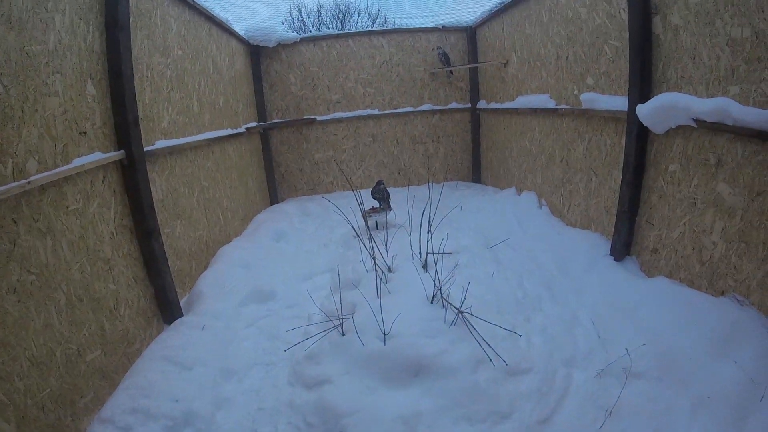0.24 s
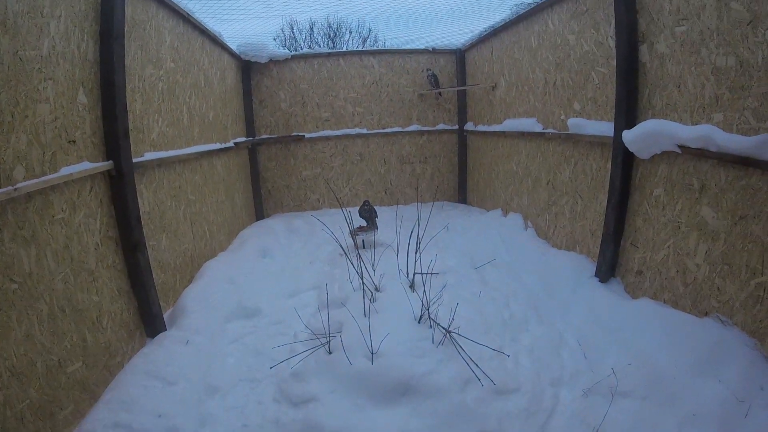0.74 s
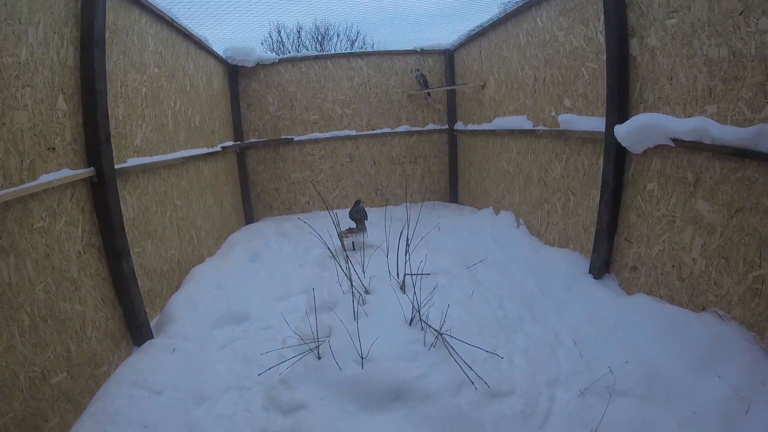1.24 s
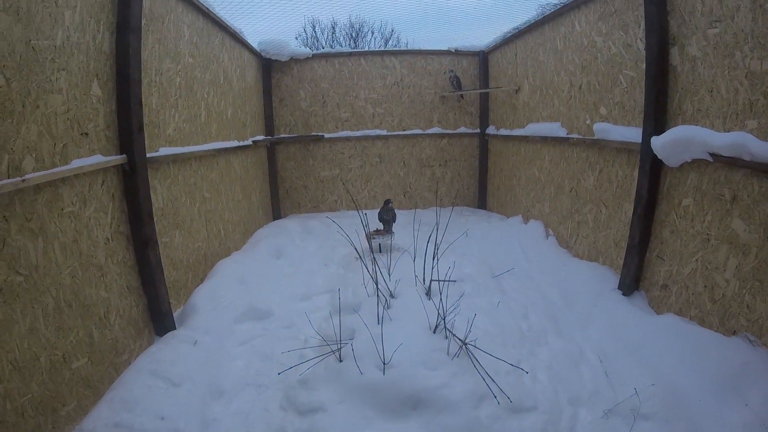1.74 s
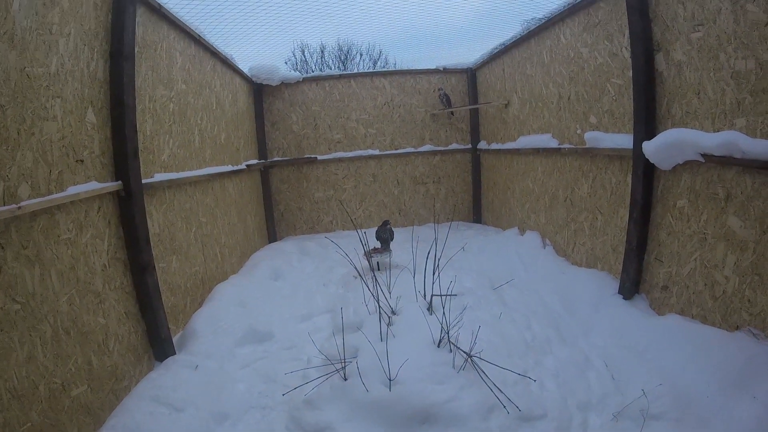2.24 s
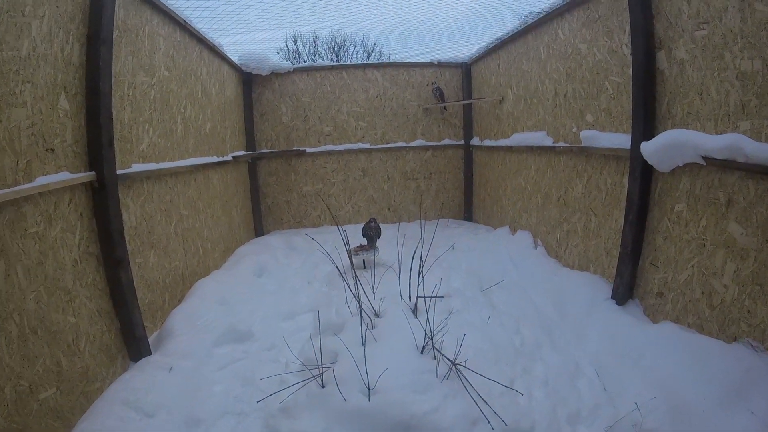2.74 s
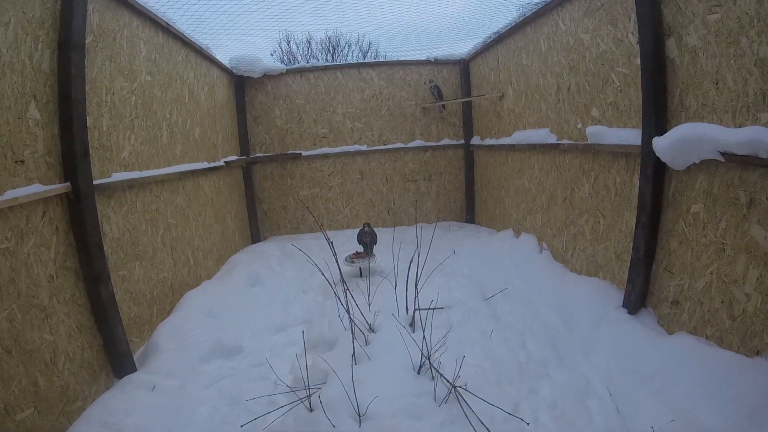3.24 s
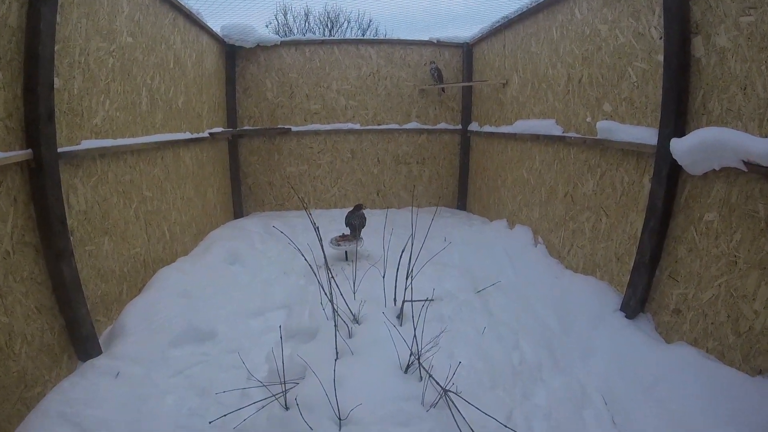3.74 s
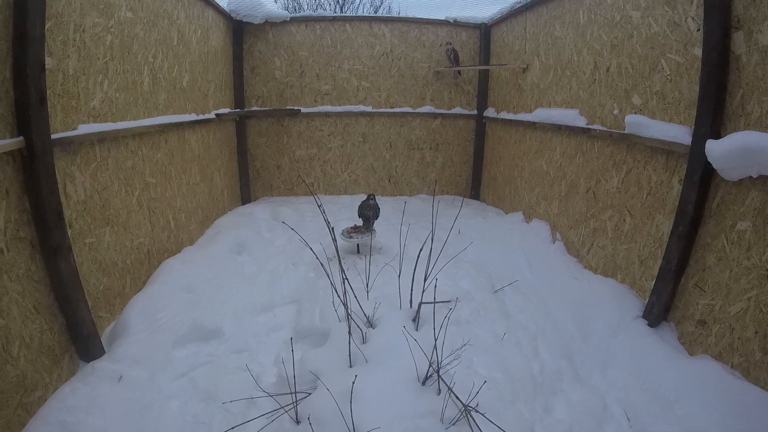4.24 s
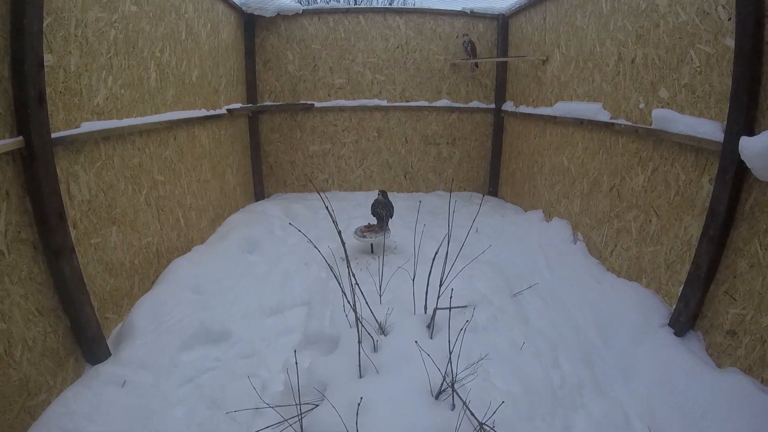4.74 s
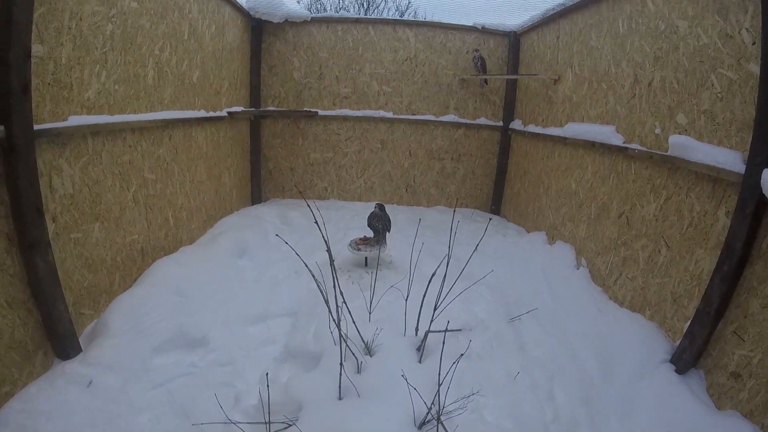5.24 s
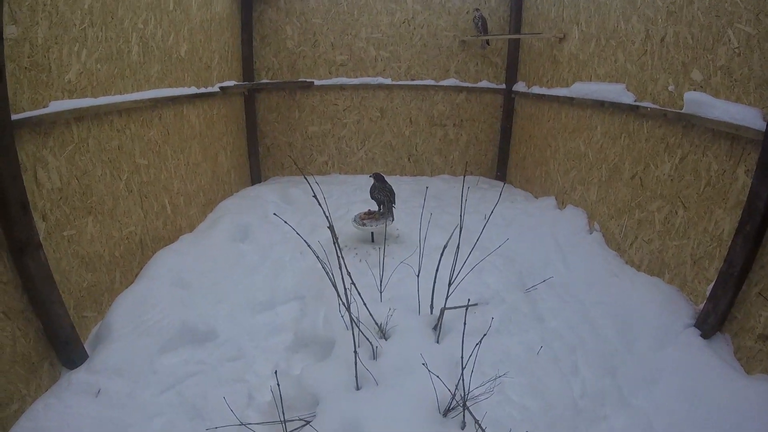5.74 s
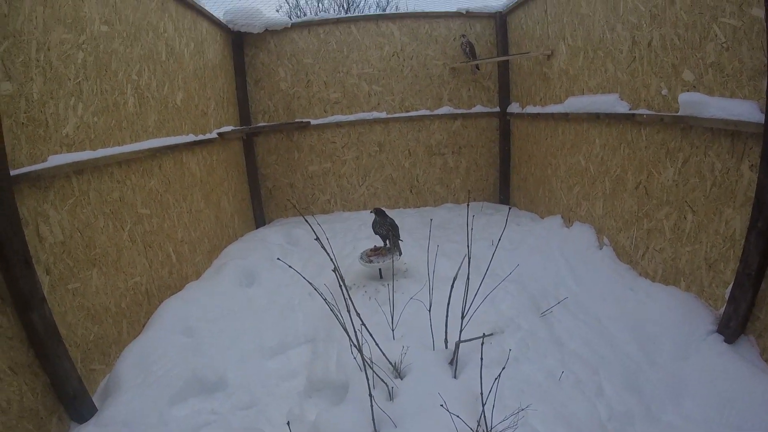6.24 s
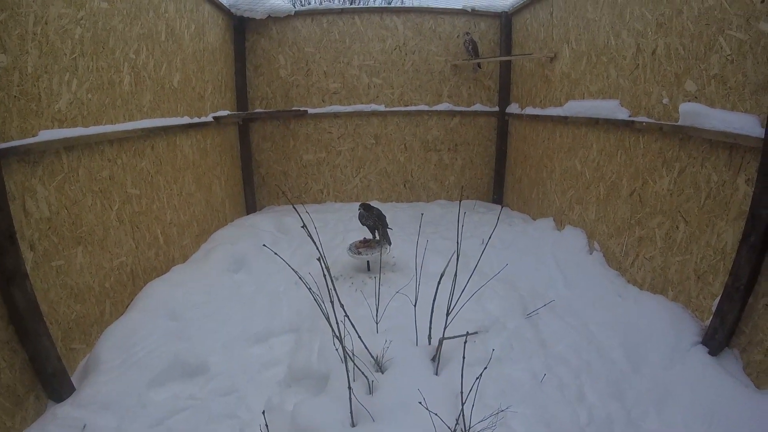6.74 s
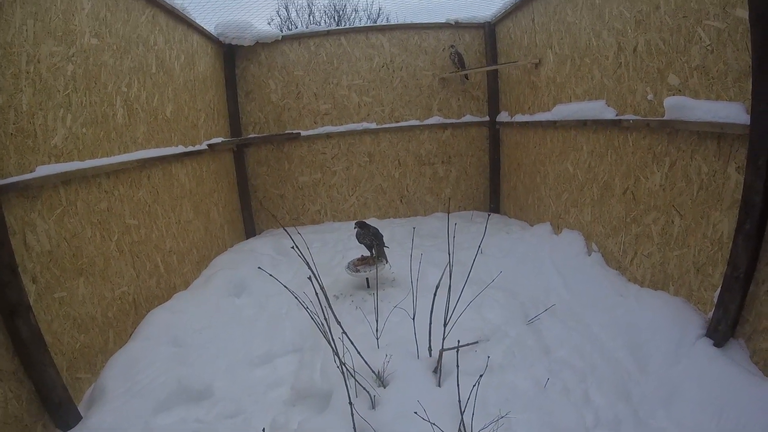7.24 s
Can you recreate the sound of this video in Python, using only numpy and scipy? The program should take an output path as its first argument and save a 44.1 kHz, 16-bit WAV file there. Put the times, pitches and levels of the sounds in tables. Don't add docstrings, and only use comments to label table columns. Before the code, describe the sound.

A falcon calls loudly and repeatedly in a board-walled, open-air pen. Each cry starts as a low rasp, climbs, and breaks into a short harsh scream; the walls ring briefly after it. Dull door thuds and glove rubbing sit close to the microphone underneath. The cackling ends around five seconds, then faint scuffs and clicks crowd together over a quiet low outdoor rumble.

```python
import sys
import numpy as np
from scipy import signal
from scipy.fft import rfft, irfft, next_fast_len
from scipy.io import wavfile
from scipy.ndimage import uniform_filter1d, minimum_filter1d, map_coordinates

SR = 44100
rng = np.random.default_rng(int(sys.argv[2]) if len(sys.argv) > 2 else 0)


def file_out(sig):
    cols = np.atleast_2d(sig).T
    lim = np.clip(cols, -1, 1)
    pcm = np.round(lim * 32767).astype(np.int16)
    wavfile.write(sys.argv[1], SR, pcm)


def gain_from_decibels(decibels):
    exponent = np.asarray(decibels, float) / 20
    return 10 ** exponent


N = 329426


def unit(x):
    return x / np.sqrt(np.mean(x ** 2) + 1e-20)


def noise(count):
    return rng.standard_normal(count)


def along(points, hz):
    f, v = np.transpose(points)
    return np.interp(np.log(hz + 1), np.log(f + 1), v)


def wobble(count, knots_per_s):
    return map_coordinates(noise(SR // 2), [np.arange(count) * knots_per_s / SR])


def coloured(x, spectrum):
    size = next_fast_len(len(x) + SR // 8)
    gain = gain_from_decibels(along(spectrum, np.fft.rfftfreq(size, 1 / SR)))
    return irfft(rfft(x, size) * gain, size)[:len(x)]


# frequency in Hz, density in dB per Hz.
AIR_TONE = [(12, -44), (20, -4), (64, -10.5), (85, -8), (147, -9.5), (189, -15.5), (236, -14), (303, -26),
            (1030, -25.5), (7140, -40), (11400, -48), (13900, -53), (15100, -54)]


def air():
    level_db = -57 + 0.8 * wobble(N, 2.9)
    return gain_from_decibels(level_db) * unit(coloured(noise(N), AIR_TONE))


# frequency in Hz, level in dB.
RUB_TONE = [(50, -38.5), (120, -3), (250, 0), (550, -2), (900, -23), (1500, -44)]
# frequency in Hz, level in dB.
SCUFF_TONE = [(400, -9.5), (1000, -6.5), (2000, -5.5), (5000, -14), (9000, -21.5), (15000, -49)]
# centre in seconds, half length in seconds, rub in dB, cloth over the rub in dB.
GRIPS = [
    (.1, 1, -56, -31),
    (2.7, 0.28, -51, 6),
    (3.74, 0.31, -47, -2),
    (4.699, 0.29, -48, -18),
    (5.302, .1, -71, -2),
    (6.75, 0.094, -63.5, -2),
    (7.183, 0.14, -58, -3.5),
]


def glove():
    rest_db, rest_cloth_db = -63, -70.5
    s, half_s, rub_db, cloth_db = np.transpose(GRIPS)[:, :, None]
    swell = np.exp(-((np.arange(N) / SR - s) / half_s) ** 2)
    rub = unit(coloured(noise(N), RUB_TONE) * gain_from_decibels(0.91 * wobble(N, 21)))
    hiss = unit(coloured(noise(N), SCUFF_TONE) * gain_from_decibels(1.6 * wobble(N, 90)))
    pressed = gain_from_decibels(rest_db) + np.sum(gain_from_decibels(rub_db) * swell, axis=0)
    dragged = gain_from_decibels(rest_cloth_db) + np.sum(gain_from_decibels(rub_db + cloth_db) * swell, axis=0)
    return pressed * rub + dragged * hiss


# frequency in Hz, level in dB.
PLATE_TONE = [(900, -18), (1500, -5), (2050, 1), (2700, -12), (3700, -15), (6000, -31), (15000, -57)]
# time in seconds, peak in dB, low rub in dB.
SCUFFS = [(3.708, -29, -47), (3.714, -34, -38), (5.3756, -53, -53), (5.5546, -49, -57), (5.636, -56, -64),
          (5.754, -49.5, -59.5), (5.8601, -46.5, -48), (6.3884, -48.5, -56), (6.4742, -41.5, -43.5),
          (6.4819, -50.5, -47), (6.576, -50, -55), (6.6099, -38, -41), (6.6272, -27, -53),
          (6.6678, -46, -56), (6.6962, -39, -47), (6.716, -57, -49), (6.7288, -38, -43.5),
          (6.7787, -37, -40.5), (6.8451, -25.5, -51), (6.984, -48, -41), (6.992, -44.5, -49),
          (7.016, -43, -42), (7.0564, -49, -57), (7.0768, -45, -42.5), (7.09, -47, -48), (7.1618, -44, -54),
          (7.1911, -39, -43.5), (7.2082, -43, -40), (7.2426, -50, -50)]


def door_scuffs():
    scuff_s, hard_s, hard_db = 0.015, 0.0097, -30.5
    out, t = np.zeros(N + SR), np.arange(SR // 8) / SR
    for s, db, rub_db in SCUFFS:
        u = t / (hard_s if db > hard_db else scuff_s)
        grit = noise(len(t)) * gain_from_decibels(0.99 * wobble(len(t), 500))
        ring_db = np.clip(2 * (db - hard_db), -30, 12)
        ring = gain_from_decibels(ring_db) * unit(coloured(grit, PLATE_TONE))
        click = unit(unit(coloured(grit, SCUFF_TONE)) + ring)
        click *= (u * 1.68 * np.exp(1 - u * 1.87)) ** 2
        rub = unit(coloured(noise(len(t)), RUB_TONE)) * u * 1.9 * np.exp(1 - u * 1.62)
        out[round((s - 0.005) * SR):][:len(t)] += gain_from_decibels(db - 9) * click + gain_from_decibels(rub_db - 3) * rub
    return out[:N]


# multiple of the thud's pitch, level in dB.
THUD_TONE = [(.15, -60), (.5, 0), (1, 5), (2, 5), (4, -31), (12, -80)]
# time in seconds, peak in dB, pitch in Hz.
THUDS = [
    (0.381, -36.5, 347),
    (0.69, -39, 288),
    (1.266, -38, 410),
    (2.857, -31.5, 305),
    (3.194, -29.5, 400),
    (3.598, -31.5, 157),
    (3.702, -25.5, 265),
]


def door_thuds():
    t60_s, rise_s = 0.05, 0.0018
    out, t = np.zeros(N + SR), np.arange(SR // 8) / SR
    for s, db, hz in THUDS:
        body = unit(coloured(noise(len(t)), [(hz * k, level) for k, level in THUD_TONE]))
        body = 1.7 * body + 0.8 * np.sin(2 * np.pi * hz * t)
        decay = gain_from_decibels(db - 1 - 60 * t / t60_s) * (1 - np.exp(-t / rise_s))
        out[round((s - 0.002) * SR):][:len(t)] += decay * body
    return out[:N]


# frequency in Hz, T60 in seconds.
WALLS_T60 = [(150, 0.84), (1000, 0.42), (4000, 0.29), (12000, 0.3)]
# delay in seconds, level in dB.
NEAR_BOARDS = [(.0052, 0.5), (.0083, -4), (.0121, 1.5), (.0168, -3), (.0217, -13.5), (.0279, -4.5)]


def walls(x):
    direct_db = -0.5
    hz, t, z = signal.stft(noise(SR // 2), SR, nperseg=256)
    decay = gain_from_decibels(-60 * t / along(WALLS_T60, hz)[:, None])
    tail = signal.istft(z * decay, SR, nperseg=256)[1]
    tail *= np.clip((np.arange(len(tail)) / SR - 0.004) / 0.0078, 0, 1)
    tail /= np.linalg.norm(tail)
    tail[0] = gain_from_decibels(direct_db)
    for delay_s, db in NEAR_BOARDS:
        tail[round(delay_s * SR)] += gain_from_decibels(db - 8) * rng.choice([-1, 1])
    return signal.fftconvolve(x, tail)


def syrinx(hz, jitter, shimmer_db, rough):
    phase = 2 * np.pi * np.cumsum(hz * (1 + jitter * wobble(len(hz), 258.87))) / SR
    k = np.arange(1, 33)[:, None]
    harmonics = np.cos(k * phase + 0.12 * k ** 2) * (k * hz < 15500)
    pulses = unit(np.sum(harmonics * np.sqrt(hz), axis=0))
    puffs = unit((1 + 0.37 * np.cos(phase)) * noise(len(hz)))
    share = np.clip(rough, 0, 1)
    voice = np.sqrt(1 - share) * pulses + np.sqrt(share) * puffs
    return voice * gain_from_decibels(shimmer_db * wobble(len(hz), 220))


def throat(x, spectrum, stretch, bright_db, thin_db):
    hz, t, z = signal.stft(x, SR, nperseg=256, noverlap=192)
    hz = hz[:, None]
    at = np.clip(t * SR, 0, len(x) - 1).astype(int)
    db = along(spectrum, hz / stretch[at])
    db += bright_db[at] * np.clip(np.log2(hz / 2000 + 0.0081), 0, 1.2)
    db += thin_db[at] * (hz < 950)
    return unit(signal.istft(z * gain_from_decibels(db), SR, nperseg=256, noverlap=192)[1][:len(x)])


# frequency in Hz, level in dB.
SHUT_BEAK = [(230, -22), (350, -26.5), (540, -10), (900, -22.5), (1300, -19), (1580, -8), (1830, -1),
             (2100, -8), (2450, -10.5), (3000, -24), (3750, -12.5), (4700, -28), (5800, -21), (15000, -61)]


def rasp(t, rise, length, level_db, slack_db):
    effort = np.clip(t / rise, 0, 1)
    after = np.clip((t - rise) / (length - rise), 0, 1)
    slap = np.cos(2 * np.pi * np.cumsum(222 + 9 * wobble(len(t), 40)) / SR)
    hz = 577.9 + 149.94 * effort ** 1.2 - 58.6 * after
    hz -= 24.9 * np.exp(-t / 0.015)
    hz *= 1 + 0.022 * wobble(len(t), 45)
    voice = syrinx(hz, jitter=0.023, shimmer_db=2.5, rough=0.36) * (1 + 0.6 * slap)
    voice += gain_from_decibels(slack_db - 9 * effort ** 3) * slap
    bright_db = 7 * effort ** 8.4 - 5 - 5.5 * np.exp(-t / 0.012)
    thin_db = -8.5 * effort ** 2
    voice = throat(voice, SHUT_BEAK, 0.92 + 0.17 * effort, bright_db, thin_db)
    full_db = 4 + 24 * rise
    swell_db = np.interp(t, [0, 0.002, 0.03, rise, length, length + 0.012],
                         [-30, -5, 3, full_db, full_db - 6.5, -42])
    return gain_from_decibels(level_db + swell_db) * voice


# frequency in Hz, level in dB.
OPEN_BEAK = [(300, -37), (650, -39.5), (880, -18.5), (1100, -15), (1330, -20.5), (1600, -16), (1950, 8),
             (2250, -1.5), (2750, -4.5), (3300, -10), (4400, -8.5), (5100, -16), (5800, -13),
             (15000, -57.5)]


def scream(t, rise, length, level_db, pitch_hz):
    clear_hz = 1110
    hz = pitch_hz * np.interp(t, [rise - 0.04, rise + 0.01, length - 0.025, length + 0.0069],
                              [0.85, 0.97, 1.025, 0.83])
    rough = 0.32 + 0.0025 * max(clear_hz - pitch_hz, 0)
    voice = syrinx(hz, jitter=0.02, shimmer_db=2.6, rough=rough)
    voice = throat(voice, OPEN_BEAK, (hz / 1110) ** 0.5, 0 * t, 0 * t)
    swell_db = np.interp(t, [rise - 0.07, rise - 0.035, rise + 0.018, length - 0.015, length + 0.006],
                         [-43.5, -15.5, 1.5, -2, -44])
    return gain_from_decibels(level_db + swell_db) * voice


# frequency in Hz, level in dB.
SKULL_TONE = [(100, -34.5), (200, -3.5), (6000, -2.5), (7000, -10), (8200, -0.5), (10800, 4), (12800, -3.5),
              (15500, -3)]
# start in seconds, break in seconds, scream in dB, scream pitch in Hz.
CACKLE = [(-.15, -0.038, -9, 1153), (0.166, 0.245, -12.5, 1081), (0.457, 0.559, -9, 1152),
          (0.747, 0.841, -8.5, 1163), (1.045, 1.142, -9.5, 1156), (1.348, 1.456, -10.5, 1034),
          (1.76, 1.91, -14, 1079), (2.206, 2.356, -13, 1102), (2.602, 2.729, -10.5, 1128),
          (2.953, 3.068, -11.5, 1104), (3.344, 3.474, -12, 1123), (3.728, 3.848, -14.5, 1044),
          (4.098, 4.22, -11, 1108), (4.465, 4.59, -10.5, 1114), (4.859, 5.009, -14, 1041)]


def falcon():
    early_s, scream_s = 0.004, 0.063
    fresh_db, tired_db, tires_s, tiring_s = -20.5, -10.5, 3.0, 0.4
    lead = SR // 4
    out = np.zeros(N + lead + SR)
    for start, snap, scream_db, hz in CACKLE:
        rise = snap - start
        slack_db = fresh_db + (tired_db - fresh_db) / (1 + np.exp((tires_s - start) / tiring_s))
        rasp_db = -27 - 49.5 * (rise - 0.12)
        rise += early_s
        length = rise + scream_s
        t = np.arange(round((length + 0.03) * SR)) / SR
        cry = rasp(t, rise, length, rasp_db, slack_db) + scream(t, rise, length, scream_db, hz)
        cry = walls(cry)
        out[lead + round((start - early_s) * SR):][:len(cry)] += cry
    return coloured(out, SKULL_TONE)[lead:lead + N]


def scene():
    return (air() + glove() + door_scuffs() + door_thuds() + falcon())[None]


def top_cut(x):
    return signal.sosfilt(signal.butter(12, 15240, fs=SR, output="sos"), x)


# frequency in Hz, level in dB.
INPUT_BAND = [(20, 0), (15100, 0), (15300, -60)]


def record(dry):
    ceiling, hold = 0.84, round(0.004 * SR)
    gain = ceiling / np.maximum(np.abs(dry[0]), ceiling)
    gain = uniform_filter1d(minimum_filter1d(gain, size=2 * hold), size=hold)
    mix = coloured(dry[0] * gain, INPUT_BAND)[None]
    return top_cut(mix)


dry = scene()
out = record(dry)
file_out(out)
```